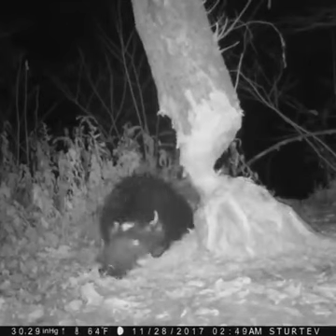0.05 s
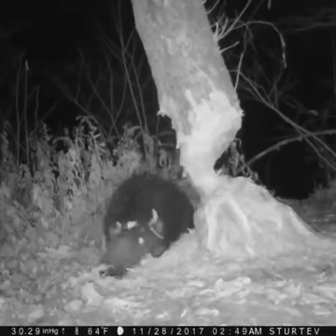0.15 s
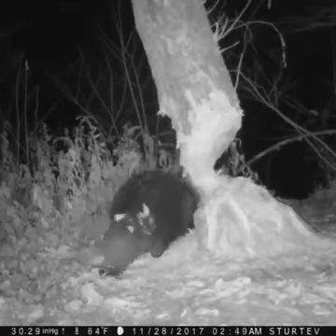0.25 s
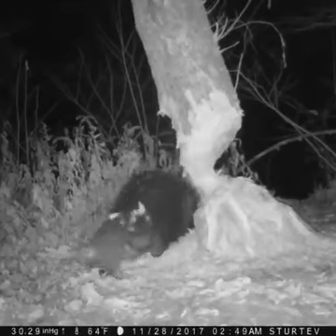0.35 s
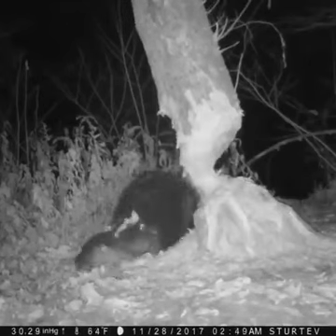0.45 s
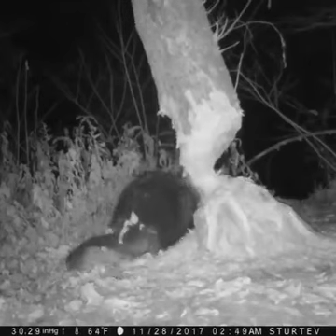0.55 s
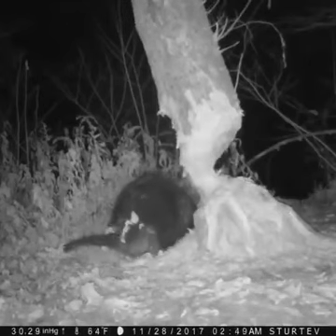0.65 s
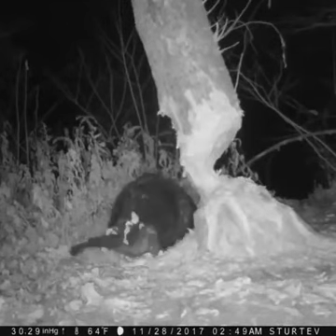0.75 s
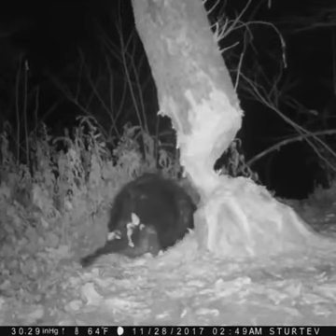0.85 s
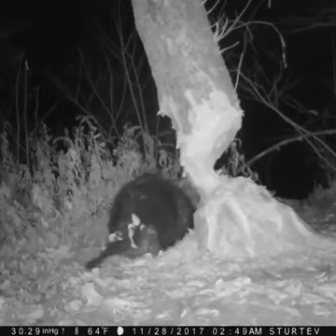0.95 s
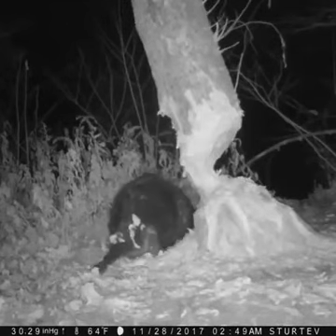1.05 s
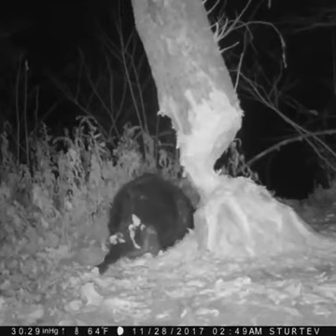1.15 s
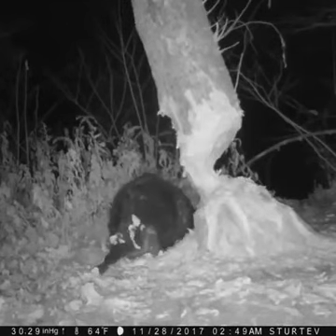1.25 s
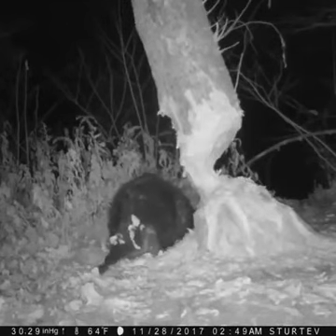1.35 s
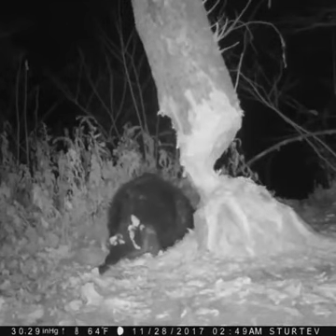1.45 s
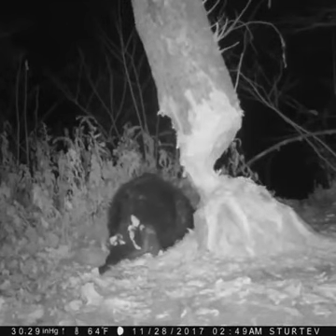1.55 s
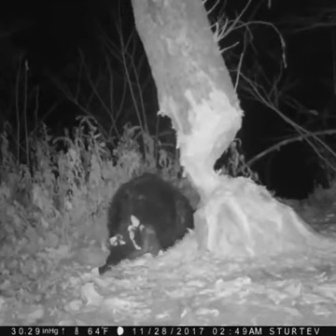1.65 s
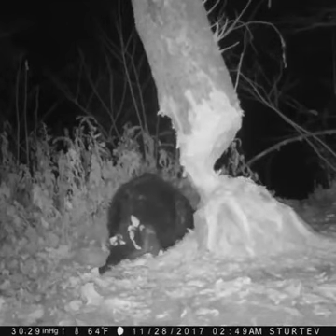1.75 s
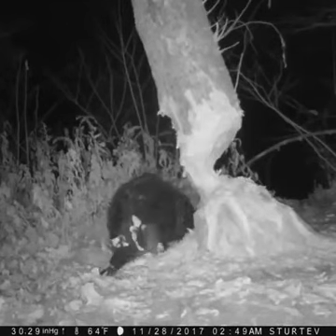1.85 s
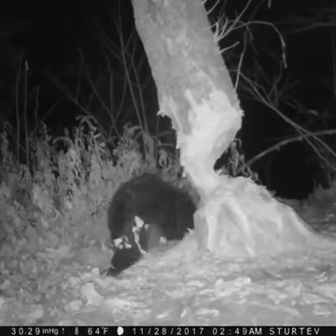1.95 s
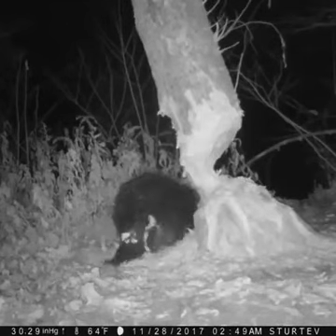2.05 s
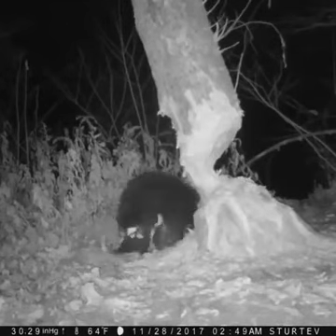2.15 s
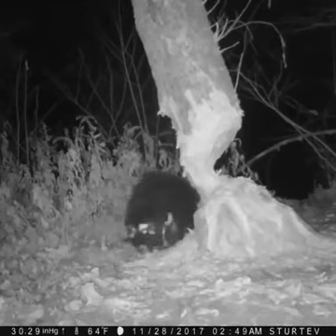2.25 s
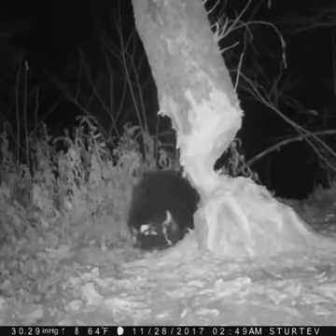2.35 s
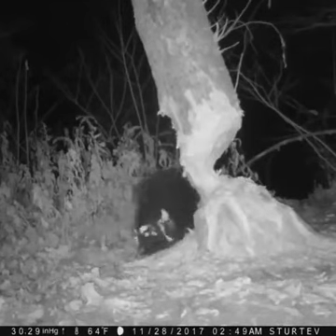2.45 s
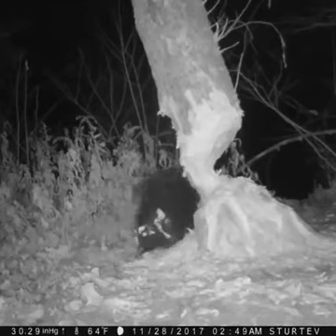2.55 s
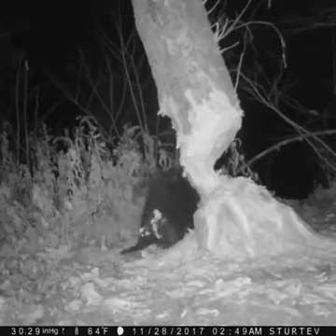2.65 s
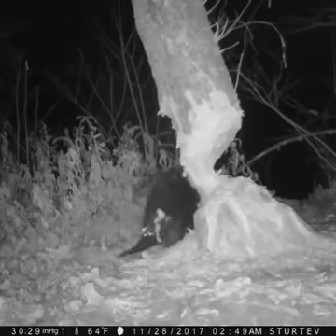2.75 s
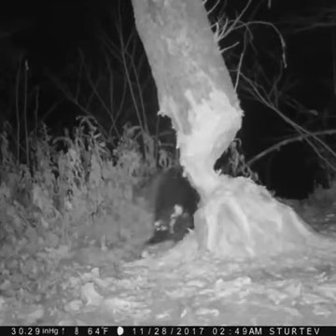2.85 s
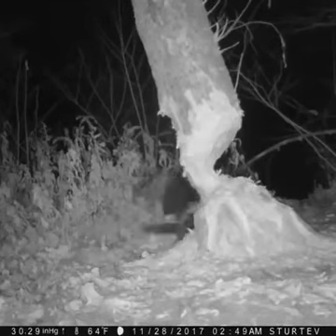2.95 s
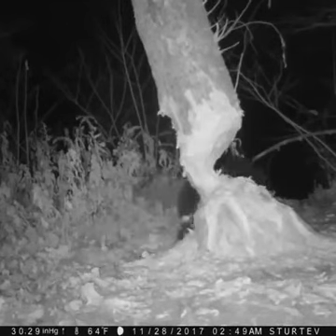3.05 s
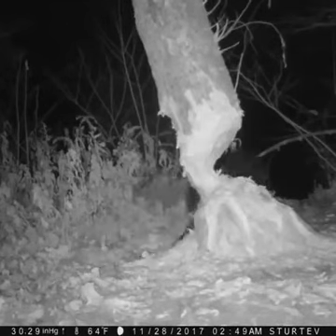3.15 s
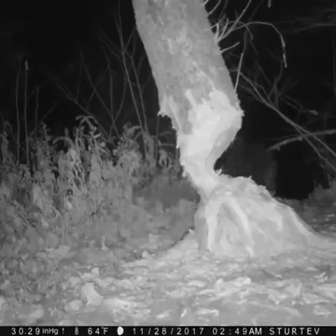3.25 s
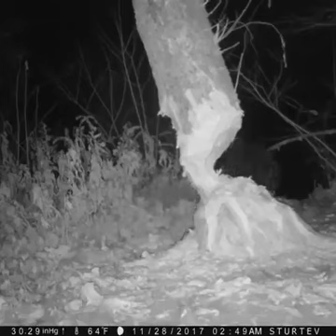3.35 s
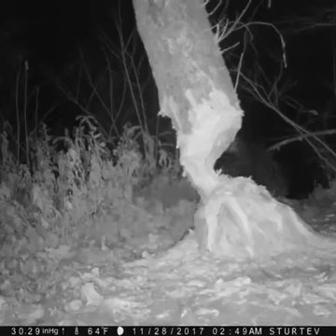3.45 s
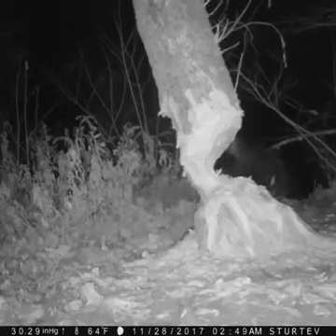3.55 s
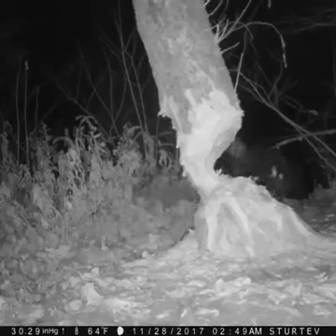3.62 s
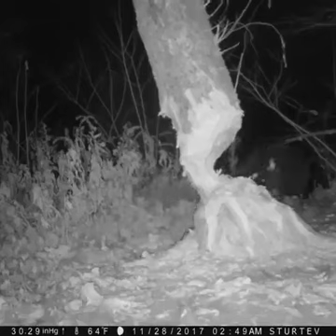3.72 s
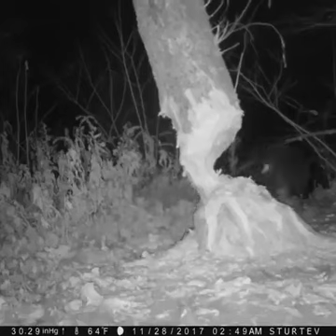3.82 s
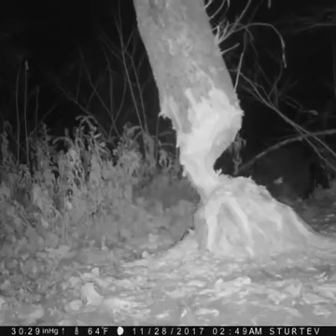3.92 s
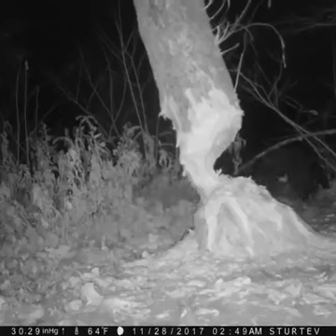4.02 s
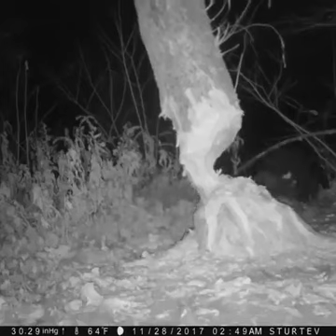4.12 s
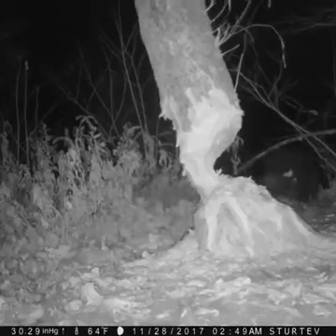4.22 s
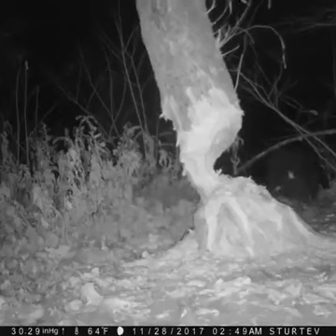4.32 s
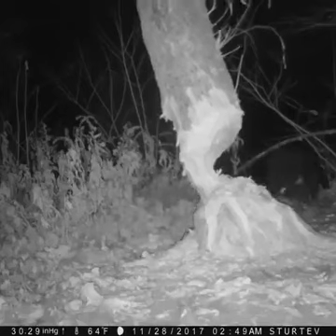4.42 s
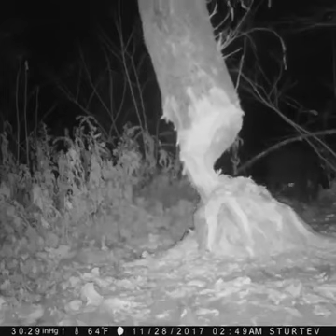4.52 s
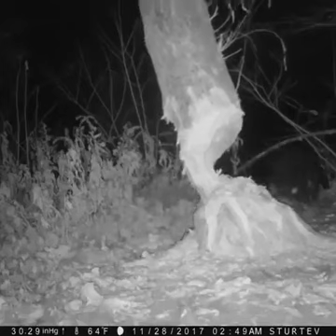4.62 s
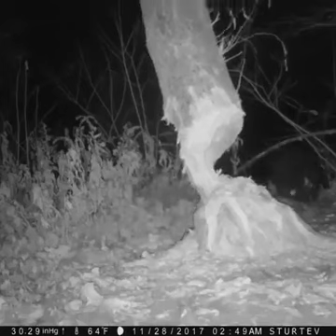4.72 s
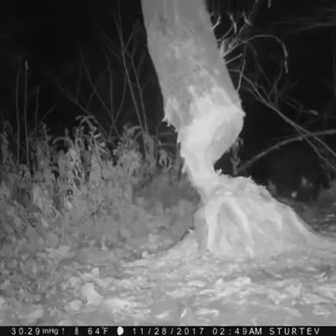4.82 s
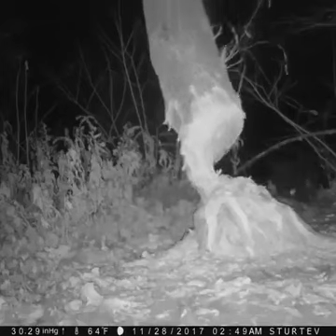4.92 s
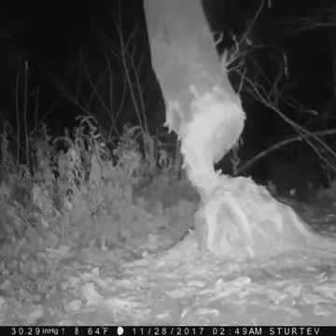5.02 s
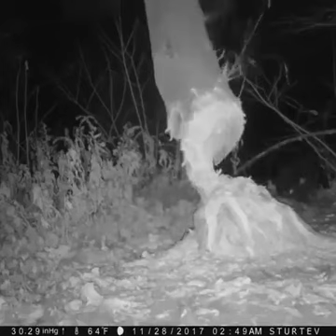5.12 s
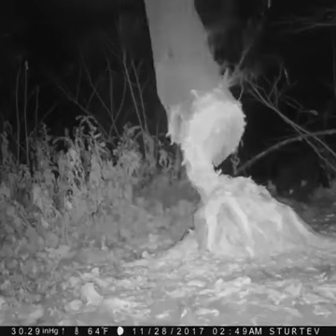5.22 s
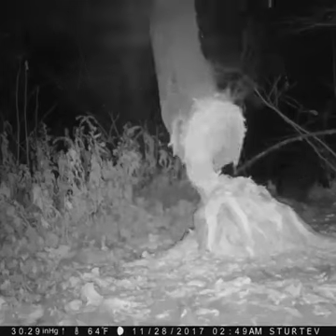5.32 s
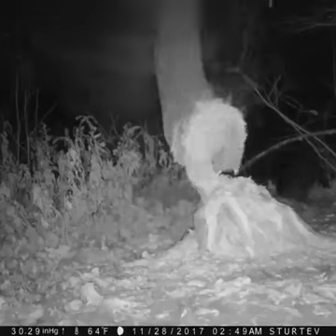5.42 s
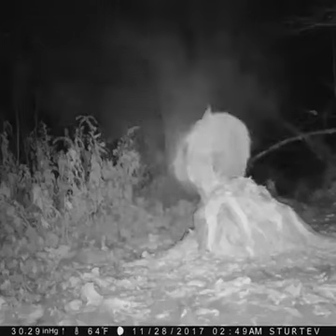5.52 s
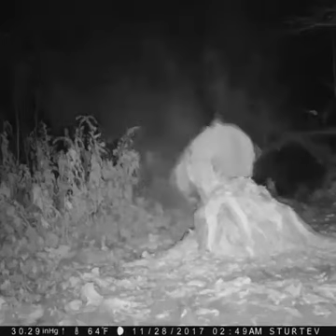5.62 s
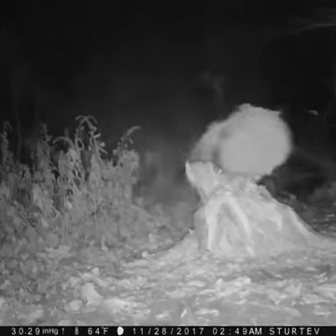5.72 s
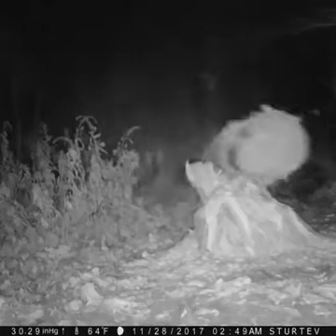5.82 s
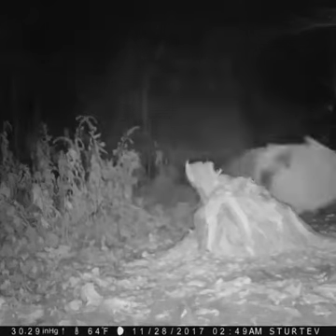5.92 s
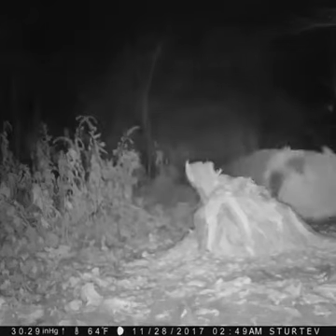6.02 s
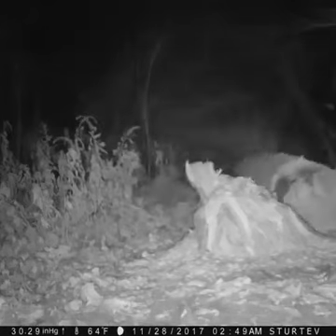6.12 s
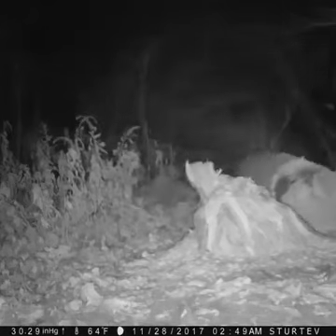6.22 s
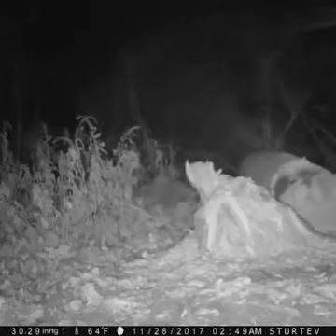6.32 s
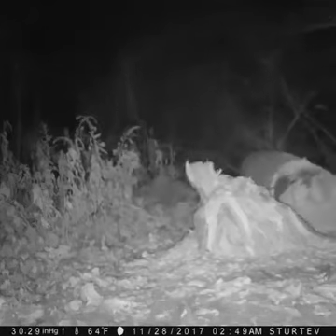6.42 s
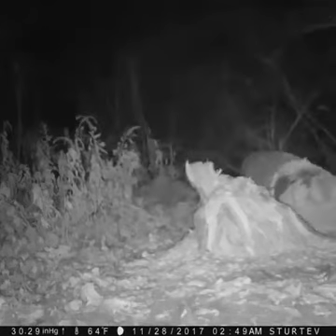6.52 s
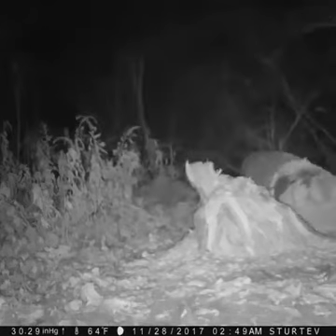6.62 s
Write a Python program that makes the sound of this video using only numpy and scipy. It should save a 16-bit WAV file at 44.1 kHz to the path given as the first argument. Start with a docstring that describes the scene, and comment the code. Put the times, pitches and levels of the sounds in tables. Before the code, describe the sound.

Sparse sharp wood snaps quicken over leaf rustling, then a tree trunk tears loudly, falls through hissing brush and thuds onto soft ground.

```python
"""The gnawed neck of a tree gives way at night: fibres snap as short ticks, whole bundles tear as dying rattles.
Snaps, tears and drops excite the trunk's bending modes; the thinnest fibres only tick.
The crown thrashes through the brush as shaped noise; the trunk lands in knocks, thumps and slow flexing.
Before that a beaver shuffles off through dry leaves: rustling noise with brighter scuffs.
Behind lie low night air and a trail camera's hiss and faint whine; the loudest peaks overload the input."""
import sys
import numpy as np
from scipy import signal
from scipy.fft import rfft, irfft, next_fast_len
from scipy.io import wavfile
from scipy.ndimage import map_coordinates

SR = 44100
rng = np.random.default_rng(int(sys.argv[2]) if len(sys.argv) > 2 else 0)


def inscribe(sig):
    """Save sig as 16-bit PCM at rate SR to the path in sys.argv[1].

    A 1-D sig is mono; a 2-D sig holds one channel per row.
    Samples are clipped to [-1, 1] before scaling.
    """
    pcm = np.round(np.clip(np.atleast_2d(sig).T, -1, 1) * 32767)
    wavfile.write(sys.argv[1], SR, pcm.astype(np.int16))


N = 294442  # samples

# resonances of the gnawed wood: centre f/Hz, width f/Hz, level/dB
WOOD_MODES = [(1426, 490, -3.5), (1653, 257, 4.5), (1788, 315, -0.5), (2357, 280, -3), (3030, 2030, -11.5)]
# spectrum of the ground's and the stump's dull knock: f/Hz, level/dB
KNOCK_SPECTRUM = [(25, -22), (50, -22), (110, 2), (170, 2.5), (300, 3), (450, -8), (800, -10.5),
                  (2000, -30)]
# spectrum of a parting fibre, thin enough to ring high: f/Hz, level/dB
TICK_SPECTRUM = [(400, -33), (1500, -21.5), (3000, -2.5), (4200, -8.5), (5800, 2), (7000, 8.5), (7900, 1),
                 (8400, -8), (11000, -8), (15500, -1)]

BREAK_S = 4.67  # the neck fails and the fall begins
FIBRE_T60_S, FIBRE_RISE_S = 0.0082, 0.0003  # all fibres die alike
KNOCK_T60_S, KNOCK_RISE_S = 0.3, 0.0055  # soft ground


def amp(db):
    """Decibels to amplitude ratio."""
    return 10 ** (np.asarray(db) / 20)


def unit(x):
    """Normalisation to rms 1."""
    return x / np.sqrt(np.mean(x ** 2) + 1e-20)


def wobble(rate):
    """A smooth random curve: spline interpolation of normal deviates, rate knots a second."""
    knots = rng.standard_normal(int(N * rate / SR) + 4)
    return map_coordinates(knots, [np.arange(N) * rate / SR])


def level_db(rows):
    """Linear interpolation of (t/s, level/dB) rows to one level per sample."""
    return np.interp(np.arange(N) / SR, *np.transpose(rows))


def filtered(x, response):
    """Linear filtering: the spectrum is multiplied by a response of frequency."""
    m = next_fast_len(N + SR // 4)
    spectrum = rfft(x, m) * response(np.fft.rfftfreq(m, 1 / SR))
    return irfft(spectrum, m)[..., :N]


def coloured(x, spectrum):
    """Spectral shaping: levels interpolate over log frequency between the points; rms 1."""
    f, db = np.transpose(spectrum)
    return unit(filtered(x, lambda hz: amp(np.interp(np.log(hz + 1), np.log(f), db))))


def noise(spectrum):
    """Gaussian noise shaped by a spectrum, at rms 1."""
    return coloured(rng.standard_normal(N), spectrum)


def resonant(x, modes):
    """Modal superposition: x drives parallel resonators of alternating sign; rms 1."""
    def response(f):
        total = 0
        for k, (centre, width, db) in enumerate(modes):
            damping = 1j * f * width
            total = total + (-1) ** k * amp(db) * damping / (centre * centre - f * f + damping)
        return total
    return unit(filtered(x, response))


def crackle(rate, spread_db, life):
    """A Poisson-like train of rate fractures a second, each a noise puff of time constant life seconds."""
    struck = rng.random(N) < rate / SR
    sizes = struck * amp(spread_db * np.clip(rng.standard_normal(N), -3, 2.2))
    power = signal.lfilter([1], [1, -np.exp(-2 / (life * SR))], sizes ** 2)
    return unit(np.sqrt(power) * rng.standard_normal(N))


def bursts(carrier, times, levels, t60s, rise):
    """Impulsive excitation: the carrier is gated into blows with a given rise and exponential decay."""
    out, t = np.zeros(N), np.arange(SR // 2) / SR
    for s, db, t60 in zip(times, levels, t60s):
        start = round(s * SR)
        decay = amp(-60 * t / max(t60, 1e-3))
        shape = (decay * (1 - np.exp(-(t / rise) ** 2)))[:N - start]
        blow = carrier[start:start + len(shape)] * shape
        # every blow gets the energy of its envelope
        out[start:start + len(shape)] += amp(db) * blow * np.linalg.norm(shape) / np.linalg.norm(blow)
    return out


def own_pitch(times, hz, knot_rate):
    """Quadrature modulation: random sidebands blur a tone that takes each blow's pitch from that blow on."""
    latest = np.maximum(np.searchsorted(times, np.arange(N) / SR, side="right") - 1, 0)
    phase = 2 * np.pi * np.cumsum(hz[latest]) / SR
    return unit(wobble(knot_rate) * np.cos(phase) + wobble(knot_rate) * np.sin(phase))


def background():
    """Stationary noise of low night air, plus the hiss and thin tone of the camera's electronics."""
    # spectrum of the night air: f/Hz, level/dB
    night_spectrum = [(12, -63), (20, -4.5), (70, -8), (98, -9), (226, -8.5), (256, -11), (361, -8),
                      (388, -12), (450, -14), (589, -17.5), (1110, -21.5), (2690, -31), (7000, -41),
                      (9100, -68), (15400, -120)]
    whine_hz = 7867
    air = amp(-43.0) * noise(night_spectrum)
    hiss = amp(-60.0) * noise([(1000, -9), (7800, -38), (8500, 16), (15500, 11)])
    whine = amp(-38.5 + .3 * wobble(5.2)) * np.sin(2 * np.pi * whine_hz * np.arange(N) / SR)
    return air + hiss + whine


def leaves():
    """Friction noise: litter rustles under the animal and scrapes more brightly at every scuff."""
    # litter stirring as the animal leaves, before stir_db: t/s, level/dB
    stir_rows = [(0.0, -48), (0.95, -56), (1.79, -54.5), (2.46, -47), (2.57, -46), (2.78, -38), (2.96, -33),
                 (3.33, -32.5), (4.24, -31), (4.6, -26)]
    # feet and tail dragging: middle t/s, length t/s, level/dB
    scuff_rows = [(0.16, 0.042, -48), (0.448, 0.032, -35.5), (0.539, 0.082, -34), (2.17, 0.093, -41),
                  (2.431, .012, -32), (2.486, 0.062, -32.5), (3.09, .024, -29), (3.292, 0.023, -22),
                  (3.352, 0.046, -24.5), (3.478, 0.087, -26.5), (3.897, 0.13, -27), (4.618, 0.013, -15.5)]
    # spectrum of the rustle: f/Hz, level/dB
    leaf_spectrum = [(150, -30), (450, -4), (900, -14), (1700, -5.5), (2400, -8.5), (3300, -4.5),
                     (4200, -7), (5600, -3), (7400, -2.5), (7900, -4), (8300, -9.5), (10500, -9),
                     (11500, -14.5), (14000, -6.5), (15800, -13)]
    # spectrum of the scuffs: f/Hz, level/dB
    scrape_spectrum = [(200, -26), (900, -13), (1700, -3.5), (2500, -7.5), (3300, -2), (4200, -4),
                       (5600, 3), (7000, 0.5), (7900, -0.5), (8300, -6), (10500, -6), (11500, -14),
                       (13500, -7), (15800, -13.5)]
    stir_db, fade_db_per_s = 1.5, 42  # the rustle fades once the tree falls

    def crunch():
        """Friction noise mixed with brittle fracture."""
        return rng.standard_normal(N) + .55 * crackle(rate=300, spread_db=4.5, life=.0007)

    t = np.arange(N) / SR
    rustle_db = level_db(stir_rows) + stir_db - fade_db_per_s * np.maximum(t - BREAK_S, 0)
    rustle = amp(rustle_db + 0.74 * wobble(31)) * coloured(crunch(), leaf_spectrum)
    scuff = sum(amp(db) * np.exp(-2 * ((t - s) / length) ** 2) for s, length, db in scuff_rows)
    return rustle + scuff * coloured(crunch(), scrape_spectrum)


def crown():
    """Common modulation: one thrashing drives hissing twigs, splintering limbs and heavy whipping boughs."""
    # how hard the crown thrashes through the brush, before the flutter: t/s, level/dB
    thrash_rows = [(4.7, -15.5), (4.826, -19.5), (5.062, -19), (5.172, -16.5), (5.536, -14.5), (5.69, -8),
                   (6.076, -19.5), (6.306, -23.5), (6.548, -29.5), (6.677, -33.5)]
    # spectrum of the twigs: f/Hz, level/dB
    twig_spectrum = [(300, -3), (1000, -5.5), (2500, 1), (4000, 0), (6200, 3.5), (7900, 1.5), (8400, -5),
                     (10000, -4), (11500, -7), (14000, -1), (15800, -8.5)]
    # resonances of the limbs: centre f/Hz, width f/Hz, level/dB
    limb_modes = [(1396, 152, 2), (1745, 314, 2.5), (1974, 370, 0), (2640, 730, -12)]
    # spectrum of the boughs: f/Hz, level/dB
    bough_spectrum = [(30, -51), (90, -26), (170, -1), (320, 15), (550, 0), (900, 0), (2000, -1.5)]
    twigs_db, limbs_db, boughs_db = 3, -4, -8.5  # shares of the thrashing
    limbs_ebb_db_per_s = 4.5  # the stiff limbs break first, the twigs go on rustling
    rise_s, flutter_db = 0.045, 1.36

    falling = np.maximum(np.arange(N) / SR - BREAK_S, 0)
    onset = 1 - np.exp(-falling / rise_s)
    thrash = amp(level_db(thrash_rows) + flutter_db * wobble(25)) * onset
    twig_snaps = crackle(rate=260, spread_db=4.5, life=.001)
    limb_snaps = crackle(rate=330, spread_db=4.5, life=.002)
    hiss = amp(twigs_db) * coloured(rng.standard_normal(N) + 0.42 * twig_snaps, twig_spectrum)
    breaking = amp(limbs_db - limbs_ebb_db_per_s * falling) * resonant(limb_snaps, limb_modes)
    whipping = amp(boughs_db) * noise(bough_spectrum)
    return thrash * (hiss + breaking + whipping)


def woods(x, t60=0.11):
    """Diffuse scattering: surrounding trunks return a thin echo, convolution with decaying noise."""
    t = np.arange(SR // 2) / SR
    tail = rng.standard_normal(len(t)) * np.exp(-np.log(1000) * t / t60)
    return signal.fftconvolve(x, tail / np.linalg.norm(tail))[:N]


def trunk_boom(times, levels):
    """Modal impulse response: the whole trunk flexes slowly after a jolt."""
    # slow bending of the whole trunk: f/Hz, level/dB, t60/s
    boom_modes = [(37.5, 2, 0.3), (55, -1.5, 0.34), (86.2, -7, 0.4), (108.7, 0, 0.41)]
    t = np.arange(SR) / SR
    flex = sum(amp(db - 60 * t / t60) * np.sin(2 * np.pi * hz * t) for hz, db, t60 in boom_modes)
    flex = flex * (1 - np.exp(-t / 0.0024))
    jolts = np.bincount(np.round(times * SR).astype(int), amp(levels), N)
    return signal.fftconvolve(jolts, flex)[:N]


def landings():
    """Impact on a soft body: the ground knocks and thumps as trunk and big limbs strike, and the trunk flexes."""
    # blows on the ground: t/s, knock level/dB, thump f/Hz, boom level/dB
    landing_rows = [(5.251, -15.5, 240.6, -38), (5.595, -17.5, 199.6, -30), (5.653, -14, 120.8, -21),
                    (5.701, -11, 160, -30), (5.722, -19, 450.3, -34), (5.764, -12, 351, -36),
                    (5.785, -25, 179.5, -36), (5.951, -19.5, 116, -27)]
    thump_db, thump_t60_s = 0, 0.18  # level relative to the knock
    s, knock_db, hz, boom_db = np.transpose(landing_rows)
    knock = bursts(noise(KNOCK_SPECTRUM), s, knock_db, np.full(len(s), KNOCK_T60_S), KNOCK_RISE_S)
    tone = own_pitch(s, hz, 90)
    thump = bursts(tone, s, knock_db + thump_db, np.full(len(s), thump_t60_s), KNOCK_RISE_S)
    return knock + thump + trunk_boom(s, boom_db)


def trunk_thud(times, levels, lag=0.013, scatter_db=1.5, blur_hz=70):
    """Slow bending waves: the thud lags the crack, and the splitting wood blurs its modes by phase diffusion."""
    # bending modes near the neck, before sag and scatter: f/Hz, level/dB, t60/s
    trunk_modes = [(119.5, -16, 0.14), (241, -12.5, 0.061), (343, -7, 0.13), (440, 7, 0.033),
                   (537.5, -8.5, 0.21), (680, 11.5, 0.0058), (845, -1, 0.067), (1094, -11, 0.023)]
    sag = 0.788  # frequency ratio of the modes once the neck has broken
    hz, db, t60 = np.transpose(trunk_modes)[:, :, None]
    out, t = np.zeros(N + SR), np.arange(SR // 7) / SR
    for s, level in zip(times, levels):
        stiffness = sag if s > BREAK_S - .03 else 1
        size, detune, phase = rng.standard_normal((3, len(hz), 1))
        steps = rng.standard_normal((len(hz), len(t)))
        drift = np.cumsum(steps, 1) * np.sqrt(2 * np.pi * blur_hz / SR)
        mode_hz = stiffness * hz * (1 + 0.026 * detune)
        swing = np.sin(2 * np.pi * (mode_hz * t + phase) + drift)
        modes = amp(db + scatter_db * size - 60 * t / t60) * swing
        out[round((s + lag) * SR):][:len(t)] += amp(level) * modes.sum(0) * (1 - np.exp(-t / 0.003))
    return out[:N]


def drops():
    """Impulsive loading: each time the neck gives, the trunk's weight jolts the stump."""
    # drops of the trunk on its stump: t/s, thud level/dB, boom level/dB
    drop_rows = [(2.864, -8.5, -54), (4.672, 3.5, -15), (4.986, -19, -20)]
    s, thud_db, boom_db = np.transpose(drop_rows)
    knock_db = boom_db + 0.5
    knock = bursts(noise(KNOCK_SPECTRUM), s, knock_db, np.full(len(s), KNOCK_T60_S), KNOCK_RISE_S)
    return trunk_thud(s, thud_db) + knock + trunk_boom(s, boom_db)


def ticks(count=18):
    """Random failure under growing strain: the thinnest fibres go more often and more loudly until the break."""
    break_db, growth_db_per_s, scatter_db = -12, 7, 3  # faint even at the break
    chance = rng.random((count, 2))
    s = BREAK_S * np.cbrt(chance[:, 0])
    scatter = scatter_db * (2 * chance[:, 1] - 1)
    db = break_db - growth_db_per_s * (BREAK_S - s) + scatter
    return bursts(noise(TICK_SPECTRUM), s, db, np.full(count, FIBRE_T60_S), FIBRE_RISE_S)


def tears(first_splinter_db=-4):
    """Cascading fracture: one hard break, then a dying rattle that rings the wood and shakes the trunk."""
    # bundles tearing: t/s, splinter level/dB, woody level/dB, t60/s, bundle pitch f/Hz
    tear_rows = [(2.865, -7.5, -7.5, 0.028, 3014), (3.8231, -10.5, -9.5, 0.022, 1350),
                 (4.236, -3.5, -10.5, .013, 2946), (4.4962, -3.5, -7, 0.019, 1702),
                 (4.670, -8.5, -1.5, 0.19, 1500), (4.701, -16, -11.5, 0.17, 1695),
                 (4.7765, -29, -5.5, 0.033, 1450), (4.81, -5, -2, 0.057, 1906), (4.86, -9, -2, 0.025, 1850),
                 (4.943, -6.5, -13, 0.061, 2000), (4.981, -11, -4.5, 0.11, 1696),
                 (4.996, -10.5, -7.5, 0.11, 1656), (5.0218, -17, -4.5, 0.022, 1650),
                 (5.058, -34, -9, 0.033, 1655), (5.125, -10.5, -14.5, 0.27, 1858),
                 (5.206, -3, -2.5, 0.014, 1493), (5.216, -6, -3.5, 0.045, 1500),
                 (5.243, -6, -7, 0.23, 1550), (5.285, -10, -10, 0.018, 1350),
                 (5.338, -12, -17, 0.067, 1710), (5.464, -10.5, -16, 0.064, 1703),
                 (5.526, -3.5, -6, 0.025, 1545), (5.567, 0, -4.5, 0.08, 2820)]
    # spectrum of the splinters: f/Hz, level/dB
    splinter_spectrum = [(300, -15), (1200, -8.5), (2200, -25), (3100, -3), (4100, -1.5), (6000, 3.5),
                         (7800, 1.5), (8400, -2.5), (10000, -6), (15500, -16)]
    ring_db, ring_t60_s = 3, 0.012  # the first fracture's ring, relative to the woody part
    base_thud_db, thud_db_per_decade = -10, 11  # over the woody part at 30 ms; longer tears shake harder
    parted_s, parted_loss_db = 5.1, 9.5  # once the hinge has parted, tears reach the trunk more weakly

    s, splinter_db, wood_db, t60, hz = np.transpose(tear_rows)
    fractures = crackle(rate=1100, spread_db=4, life=.0011)
    splinters = bursts(coloured(fractures, splinter_spectrum), s, splinter_db, t60, rise=0.000069)
    core = bursts(resonant(fractures, WOOD_MODES), s, wood_db, t60, rise=0.00042)
    first_db = splinter_db + first_splinter_db
    first = bursts(noise(splinter_spectrum), s, first_db, np.full(len(s), .016), rise=.0002)
    tone = own_pitch(s, hz, 700)
    ring = bursts(tone, s, wood_db + ring_db, np.full(len(s), ring_t60_s), rise=.0004)
    decades = np.log10(t60 / .03)
    thud_db = wood_db + base_thud_db + thud_db_per_decade * decades - parted_loss_db * (s > parted_s)
    return first + ring + splinters + core + trunk_thud(s, thud_db)


def snaps():
    """Sudden release of strain: a fibre parts with a tick of milliseconds and a woody core, and the trunk thuds."""
    # single fibres snapping: t/s, tick level/dB, woody level/dB relative to the tick
    snap_rows = [(2.04, -26, -27), (2.746, -14, -26), (3.171, -3, -29), (3.247, -8.5, -19),
                 (3.281, -5, -30), (3.441, 1.5, -29), (3.4927, 0.5, -35), (3.5847, 3.5, -48),
                 (3.698, -4.5, 0.5), (3.8496, 4, -10), (3.904, 2.5, -37), (4.033, -9.5, -34),
                 (4.05, -4, -10), (4.1997, -8, -28), (4.232, -1, -24), (4.2667, -2.5, -33),
                 (4.3996, -8.5, -10.5), (4.4748, -4.5, -22), (4.615, 2.5, -14), (4.914, -11, -21),
                 (5.134, 13.5, -25), (5.378, -2, -23), (5.496, 7.5, -7)]
    thud_db = -32.5  # relative to the tick
    s, db, wood_db = np.transpose(snap_rows)
    t60 = np.full(len(s), FIBRE_T60_S)
    tick = bursts(noise(TICK_SPECTRUM), s, db, t60, FIBRE_RISE_S)
    wood = resonant(rng.standard_normal(N), WOOD_MODES)
    core = bursts(wood, s, db + wood_db, t60, FIBRE_RISE_S)
    return tick + core + trunk_thud(s, db + thud_db)


def scene():
    """Superposition in the centre; opposite-phase noise spreads the treble briefly between the ears."""
    spread_from_s, spread_to_s, spread_db = 5.58, 5.78, -25
    breaks = snaps() + ticks() + tears() + drops()
    echo = amp(-8.0) * woods(breaks)
    mono = breaks + echo + landings() + leaves() + crown() + background()
    t = np.arange(N) / SR
    gate = np.clip(np.minimum(t - spread_from_s, spread_to_s - t) / .02, 0, 1)  # 20 ms ramps
    treble = noise([(3000, -53), (4500, -23), (7800, 11), (8500, -25), (15000, -4)])
    side = amp(spread_db) * gate * treble
    return np.array([mono + side, mono - side])


def record(dry):
    """Saturation, then band limiting: loud peaks overload the input and the camera dulls the treble."""
    # treble response of the camera: f/Hz, level/dB
    camera_response = [(100, -0.5), (7600, -0.5), (8300, -2), (14400, -5.5), (14900, -7)]
    top_hz = 15750  # nothing passes from here up
    clipped = dry / (1 + np.abs(dry) ** 8) ** (1 / 8)
    f, db = np.transpose(camera_response)
    return filtered(clipped, lambda hz: amp(np.interp(hz, f, db)) * (hz < top_hz))


dry = scene()
out = record(dry)
inscribe(out)
```